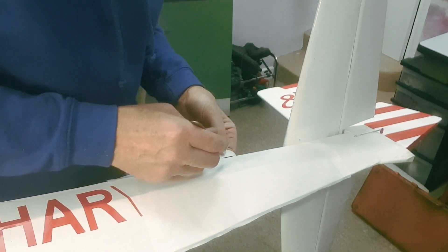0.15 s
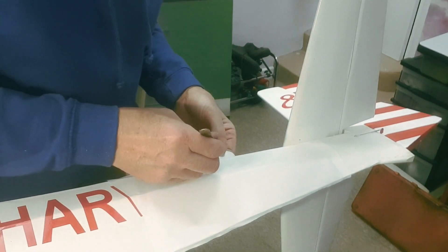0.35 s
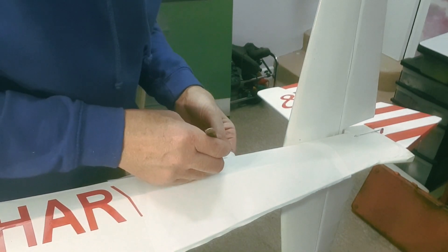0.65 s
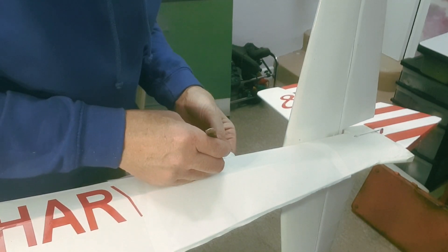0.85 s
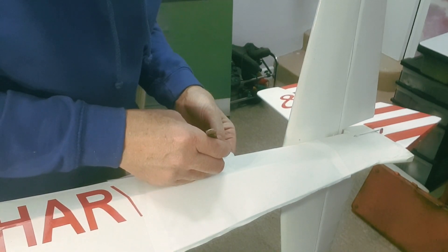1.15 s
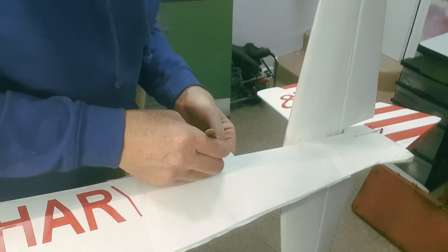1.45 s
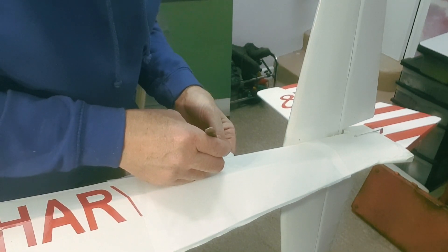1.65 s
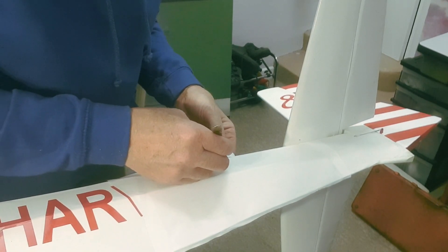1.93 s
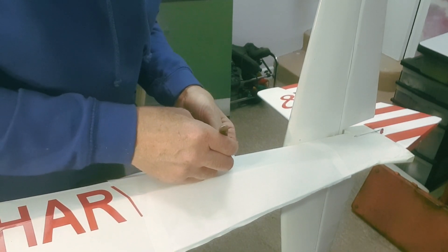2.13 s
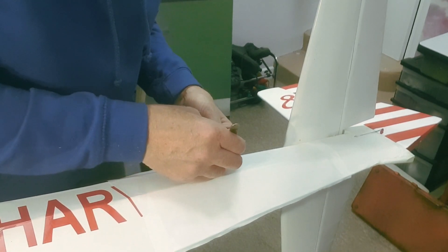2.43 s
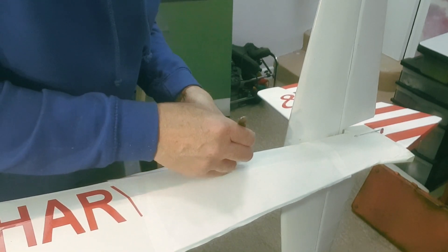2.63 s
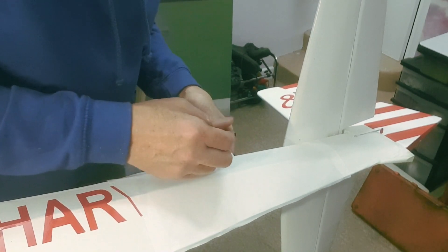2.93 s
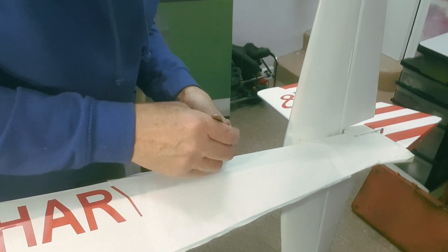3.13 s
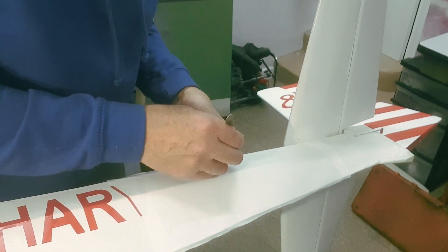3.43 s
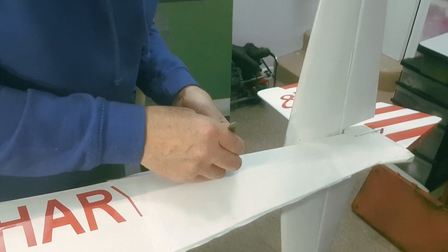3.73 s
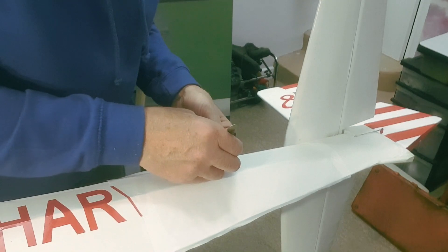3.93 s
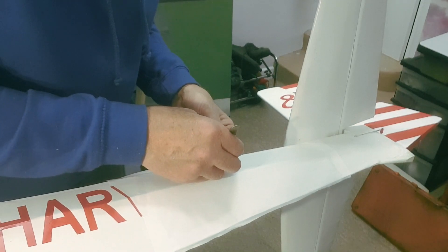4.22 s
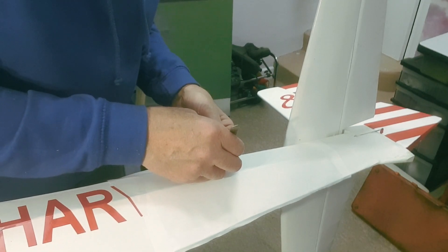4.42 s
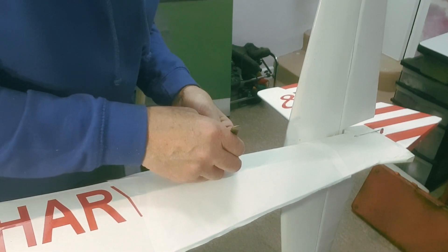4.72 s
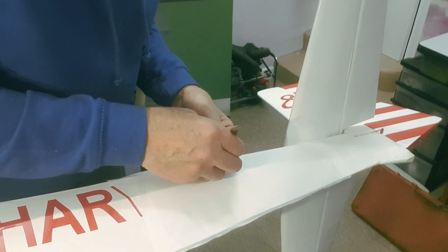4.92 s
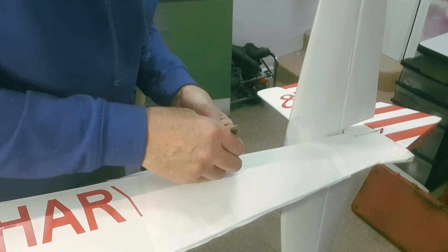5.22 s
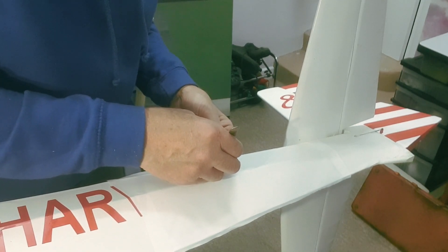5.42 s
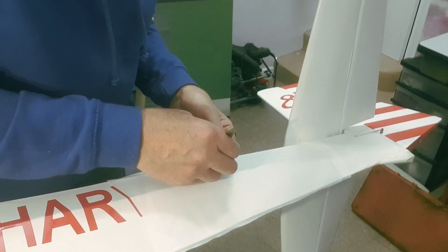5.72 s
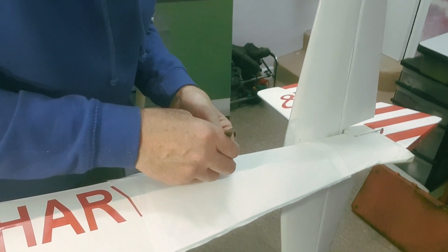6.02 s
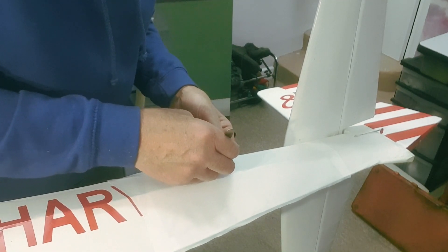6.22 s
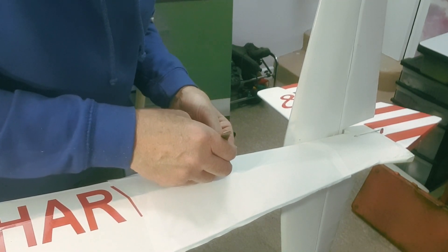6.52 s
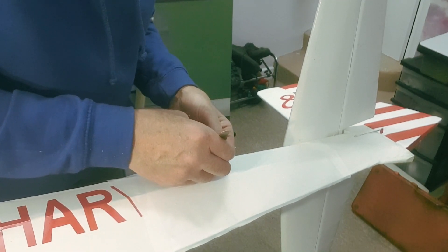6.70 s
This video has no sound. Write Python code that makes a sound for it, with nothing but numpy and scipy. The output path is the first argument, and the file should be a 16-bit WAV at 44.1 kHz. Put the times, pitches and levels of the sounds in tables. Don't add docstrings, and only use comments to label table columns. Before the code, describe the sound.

A constant low transformer hum with faint hiss and a barely audible high whine fills a small quiet workshop. Hands work on the taut covering of a light model aircraft: sparse at first, then bursts of soft hollow thumps, fingertip scratches and sleeve swishes. A bright tap clicks just after four seconds, a duller one follows, and further rubbing and small ticks continue to the end. Close stereo microphone, short room reflections.

```python
import sys
import numpy as np
from scipy import signal
from scipy.fft import rfft, irfft, next_fast_len
from scipy.io import wavfile
from scipy.ndimage import uniform_filter1d

SR = 44100
rng = np.random.default_rng(int(sys.argv[2]) if len(sys.argv) > 2 else 0)


def materialize(psi):
    bounded = np.clip(np.atleast_2d(psi).T, -1, 1)
    quanta = np.round(bounded * 32767).astype(np.int16)
    wavfile.write(sys.argv[1], SR, quanta)


def gain_from_db(level_db):
    decades = np.asarray(level_db, float) / 20
    return 10 ** decades


N = 302526
SIZE = next_fast_len(N + SR)
HZ = np.arange(SIZE // 2 + 1) * SR / SIZE
TIME = np.arange(N) / SR


def shape_db(table):
    hz, db = np.transpose(table)
    return np.interp(np.log(HZ + 1), np.log(hz), db)


def modes_db(modes):
    power = 1e-9
    for hz, width_hz, db in modes:
        detune = (HZ - hz) / (width_hz / 2)
        power = power + gain_from_db(db) ** 2 / (1 + detune ** 2) ** 2
    return 10 * np.log10(power)


def colour(x, gain_db):
    cepstrum = irfft(gain_db * np.log(10) / 20, SIZE)
    cepstrum[1:SIZE // 2] *= 2
    cepstrum[SIZE // 2 + 1:] = 0
    return irfft(rfft(x, SIZE) * np.exp(rfft(cepstrum)), SIZE)[..., :N]


def unit(x):
    return x / np.sqrt(np.mean(x ** 2))


def walk(rate_hz):
    hold = int(SR / rate_hz)
    steps = np.repeat(rng.standard_normal(N // hold + 1), hold)
    slewed = uniform_filter1d(uniform_filter1d(steps, hold), hold)
    return 0.71 * slewed[:N]


HUM_HZ = 100.125
HUM_SAG_DB = -0.45
# multiple, left_db, right_db, phase_rad, wobble_db
HUM_PARTIALS = [
    (1, -41.75, -42.4, .62, .03),
    (2, -60.5, -58, -3.03, .6),
    (3, -75.5, -82, -.75, 1.5),
    (4, -86, -86, .3, 2.2),
]


def hum():
    out = np.zeros((2, N))
    for multiple, left_db, right_db, phase_rad, wobble_db in HUM_PARTIALS:
        angle = 2 * np.pi * round(multiple) * HUM_HZ * TIME + phase_rad
        tone = np.sqrt(2) * np.cos(angle) * gain_from_db(wobble_db * walk(1.52))
        out += gain_from_db(np.array([[left_db], [right_db]])) * tone
    return out * gain_from_db(HUM_SAG_DB * (TIME / TIME[-1] - 0.5))


WHINE_HZ = 15069
# offset_in_hum_multiples, level_db
WHINE_LINES = [
    (-2, -90.5),
    (-1, -85),
    (0, -75.5),
    (1, -83.5),
]


def whine():
    drift = 2 * np.pi * np.cumsum(3.4 * walk(2.1)) / SR
    side_phase = np.array([[0.9], [-0.9]])
    out = np.zeros((2, N))
    for offset, db in WHINE_LINES:
        phase = 2 * np.pi * (WHINE_HZ + round(offset) * HUM_HZ) * TIME + drift
        fade = gain_from_db(db + 3.0 * walk(1.4))
        out += fade * np.sqrt(2) * np.cos(phase + side_phase)
    return out


# freq_hz, density_db_per_hz
RUMBLE_MID = [(20, -94.5), (32, -99.5), (41, -89.5), (49, -78), (70, -78.5), (120, -83), (170, -86.5),
              (250, -91), (330, -99), (420, -104), (600, -112), (1000, -122), (2000, -140)]
# freq_hz, relative_to_mid_db
RUMBLE_DIFFERENCE = [(30, -7.5), (100, -5.5), (300, -1), (600, -2)]
# freq_hz, density_db_per_hz
HISS_COLOUR = [(260, -33), (450, -8), (1000, -9.5), (1740, -10), (4440, -16), (6340, -16.5), (7300, -25),
               (8410, -26), (11700, -5.5), (14450, -5.5), (14700, -1.5), (15050, 1.5), (15300, -2.5),
               (15700, -2.5)]
# freq_hz, left_minus_right_db
HISS_BALANCE = [(60, -15.5), (110, 11), (200, -2), (380, 0), (700, 1), (1290, 0), (2380, 1), (4400, -1),
                (8120, 3), (15000, -1.5)]
HISS_DB = -61.0


def air():
    white = rng.standard_normal((4, N)) * np.sqrt(SR / 2)
    rumble_db, hiss_db = shape_db(RUMBLE_MID), shape_db(HISS_COLOUR)
    half_lean_db = shape_db(HISS_BALANCE) / 2
    mid = colour(white[0], rumble_db)
    side = colour(white[1], rumble_db + shape_db(RUMBLE_DIFFERENCE))
    hiss_left = colour(white[2], hiss_db + half_lean_db)
    hiss_right = colour(white[3], hiss_db - half_lean_db)
    hiss = unit(np.array([hiss_left, hiss_right])) * gain_from_db(HISS_DB)
    return np.array([mid + side, mid - side]) + hiss


def effort(rows, rest_db, rise_db_s, fall_db_s):
    power = gain_from_db(np.array(rest_db))[:, None] ** 2 + np.zeros(N)
    for start_s, held_s, *db in rows:
        early_s = np.maximum(start_s - TIME, 0)
        late_s = np.maximum(TIME - start_s - held_s, 0)
        shape = gain_from_db(-rise_db_s * early_s - fall_db_s * late_s)
        power = power + (gain_from_db(np.array(db))[:, None] * shape) ** 2
    return np.sqrt(power)


def slips(rate_hz, spread_db, channels):
    grain = gain_from_db(spread_db * walk(rate_hz))
    return grain * rng.standard_normal((channels, N))


def spread(pair, likeness, lean_db):
    c = np.clip(likeness, 0, 1)
    mid = pair[0] * np.sqrt((1 + c) / 2)
    side = pair[1] * np.sqrt((1 - c) / 2)
    return np.array([(mid + side) * gain_from_db(lean_db / 2), (mid - side) * gain_from_db(-lean_db / 2)])


# start_s, held_s, skin_db, rib_db
PUSH_EVENTS = [(.202, .005, -69, -84), (.774, .005, -67, -83), (1.404, .01, -69, -85),
               (1.602, 0.018, -62.5, -77), (1.77, .005, -61.5, -77), (1.846, .01, -63.5, -72),
               (1.94, .02, -69, -72), (2.0, .07, -60, -75), (2.115, 0.16, -64.5, -70.5),
               (2.31, 0.19, -61, -73), (2.465, 0.046, -54, -67), (2.575, .04, -64, -68),
               (2.689, .005, -57, -72), (3.046, .01, -65, -86), (3.553, 0.043, -52, -64.5),
               (3.775, 0.077, -61.5, -74.5), (4.17, 0.054, -67, -75), (4.31, 0.0046, -64, -90),
               (4.436, .03, -66, -90), (4.648, 0.025, -63.5, -84), (4.79, .03, -65, -78),
               (5.072, 0.0075, -64, -88), (5.205, 0.073, -54.5, -64.5), (5.412, .04, -57.5, -64),
               (5.535, 0.043, -56.5, -67), (5.86, .01, -71, -81), (6.424, 0.095, -61, -72.5),
               (6.72, 0.091, -60, -68), (6.84, .02, -54.5, -62)]
PUSH_RISE_DB_S, PUSH_FALL_DB_S = 643, 220
# start_s, held_s, scratch_db, swish_db
STROKE_EVENTS = [(.33, .03, -79, -80.5), (1.336, .04, -91, -82), (1.602, .01, -82, -87),
                 (1.846, 0.036, -76, -80), (1.95, 0.15, -80, -81.5), (2.148, .16, -74, -80),
                 (2.335, 0.12, -70, -72.5), (2.49, 0.12, -75.5, -69), (2.61, 0.028, -73, -66),
                 (3.05, .07, -89, -84), (3.338, 0.022, -79, -83), (3.566, 0.05, -77, -81),
                 (3.79, 0.018, -79, -79.5), (4.23, .06, -83, -71.5), (4.34, 0.017, -77, -73.5),
                 (4.61, 0.033, -77.5, -80), (4.93, .04, -82, -79.5), (5.072, .02, -76, -83),
                 (5.232, 0.046, -70, -71), (5.35, 0.092, -75, -76), (5.54, 0.026, -72, -74),
                 (5.68, .03, -94, -81), (5.86, .01, -89, -85), (6.262, .01, -82, -87),
                 (6.324, 0.022, -79, -79.5), (6.424, 0.093, -73.5, -76), (6.698, .03, -75, -82),
                 (6.73, .02, -75, -82), (6.795, .07, -86, -70)]
STROKE_RISE_DB_S, STROKE_FALL_DB_S = 344, 178
# skin_db, rib_db, scratch_db, swish_db
HOLD_DB = (-81, -109.5, -91.5, -91)
# freq_hz, width_hz, gain_db
SKIN_MODES = [
    (182, 100, -13.5),
    (236, 140, 0.5),
    (310, 40.5, 7),
    (370, 30, 0),
]
# freq_hz, width_hz, gain_db
RIB_MODES = [
    (451, 29, -1),
    (490, 62, -4),
    (611, 45, -3.5),
    (699, 70, -13),
    (1020, 370, -17.5),
]
# freq_hz, density_db_per_hz
SCRATCH_COLOUR = [(500, -24.5), (750, -1), (1100, -1), (1500, -8), (2200, -7), (2750, -2), (3200, -9),
                  (4200, -8), (5500, -35)]
# freq_hz, density_db_per_hz
SWISH_COLOUR = [(2500, -30), (3700, -15), (4550, -10.5), (4850, -3), (5250, -4.5), (5750, -6), (6700, -5),
                (7300, -18.5), (8300, -23.5), (12000, -23.5)]


def hands():
    push, rib = effort(PUSH_EVENTS, HOLD_DB[:2], PUSH_RISE_DB_S, PUSH_FALL_DB_S)
    finger, cloth = effort(STROKE_EVENTS, HOLD_DB[2:], STROKE_RISE_DB_S, STROKE_FALL_DB_S)
    skin = unit(colour(slips(60, 2.7, channels=2), modes_db(SKIN_MODES))) * push * gain_from_db(-1.5)
    ribs = unit(colour(slips(60, 3.4, channels=2), modes_db(RIB_MODES))) * rib * gain_from_db(-3.0)
    scratch = unit(colour(slips(300, 3.5, channels=2), shape_db(SCRATCH_COLOUR))) * finger * gain_from_db(1.0)
    swish = unit(colour(slips(300, 2.7, channels=2), shape_db(SWISH_COLOUR))) * cloth * gain_from_db(4.0)
    drumming = spread(skin, 0.81, -0.92) + spread(ribs, 0.72, 0.4)
    rubbing = spread(scratch, 0.089, 0.82) + spread(swish, 0.04, 2.1)
    return drumming + rubbing


ROOM_T60_S, ROOM_BUILD_S = 0.23, 0.0091


def room():
    t = TIME[:SR // 2]
    envelope = (1 - np.exp(-t / ROOM_BUILD_S)) * gain_from_db(-60 * t / ROOM_T60_S)
    tail = rng.standard_normal((2, len(t))) * envelope
    return tail / np.sqrt(np.sum(tail ** 2, axis=1, keepdims=True))


# start_s, peak_db, bounce_db, room_db
BRIGHT_BLOWS = [(1.3299, -60, 3, 3.5), (2.0503, -56, 2, -8), (2.1164, -58, 2, 2), (4.21, -29.5, -12, -3),
                (4.334, -54, 0, -6), (4.6149, -65, 11, -1.5), (5.2006, -62, 5, -11), (5.2313, -52.5, 1, 3),
                (5.249, -58, 15, -8), (5.3854, -54, -2, 2.5), (5.5235, -52.5, -2, 2.5),
                (5.629, -53.5, 1, -1.5), (6.4238, -59, 1, 10), (6.6922, -66, -1.5, -3),
                (6.7705, -40.5, 0, 0), (6.7856, -49, 3, -14), (6.834, -49, -4, -10), (6.855, -45.5, 4, -6)]
# start_s, peak_db, bounce_db, room_db
DULL_BLOWS = [
    (4.8015, -54, -17, -10),
    (4.8101, -36, 0, 0),
]
# start_s, peak_db, room_db
THUD_BLOWS = [
    (2.669, -53, -10),
]
# freq_hz, gain_db
BRIGHT_COLOUR = [(600, -41), (1200, -20), (1500, -6), (2000, -9), (2500, -2.5), (3600, -0.5), (4500, -0.5),
                 (5600, -3.5), (7200, -10), (8500, -14.5), (11500, -10), (15000, -15.5)]
# freq_hz, gain_db
DULL_COLOUR = [(600, -37), (950, -12.5), (1450, -1.5), (1840, 2), (2050, -5), (2350, 2.5), (2900, -0.5),
               (3900, -11), (4800, -5), (5300, -11), (6100, -11.5), (7200, -27), (9000, -33), (15000, -44)]
BOUNCE_S = 0.00178
THUD_HZ, THUD_T60_S = 780, 0.0088


def tap_voice(table):
    click = np.zeros(N)
    click[0] = 1
    voice = colour(click, shape_db(table))[:SR // 20]
    return -voice / np.abs(voice).max()


def taps():
    dull, bright = tap_voice(DULL_COLOUR), tap_voice(BRIGHT_COLOUR)
    t = TIME[:len(dull)]
    thud = np.sin(2 * np.pi * THUD_HZ * t) * gain_from_db(-60 * t / THUD_T60_S)
    blows = [(s, gain_from_db(db) * thud, -9, room_db) for s, db, room_db in THUD_BLOWS]
    for voice, rows in ((bright, BRIGHT_BLOWS), (dull, DULL_BLOWS)):
        blows += [(s, gain_from_db(db) * voice, bounce_db, room_db) for s, db, bounce_db, room_db in rows]
    lag = int(BOUNCE_S * SR)
    direct_lean = gain_from_db(np.array([[1.9], [-1.9]]))
    room_lean_db = np.array([[0.9], [-0.9]])
    out = np.zeros((2, N + SR))
    for start_s, voice, bounce_db, room_db in blows:
        i = int(start_s * SR)
        tail = signal.fftconvolve(voice[None], room(), axes=1)
        out[:, i:i + len(voice)] += voice * direct_lean
        out[:, i + lag:i + lag + len(voice)] += gain_from_db(bounce_db) * voice
        out[:, i:i + tail.shape[1]] += tail * gain_from_db(room_db + 8.5 + room_lean_db)
    return out[:, :N]


# start_s, peak_db, pitch_hz, swell_ms
KNOCK_EVENTS = [(1.985, -53, 220, 8.3), (2.11, -60, 486, 8), (2.474, -40.5, 215, 5.4),
                (2.471, -50, 332, 6.2), (2.522, -43, 363, 7.4), (2.571, -58, 320, 7),
                (3.548, -53, 288.4, 11), (3.574, -42.5, 307, 9.3), (3.575, -61, 610, 12),
                (3.635, -57, 294, 8), (3.789, -55, 280, 8.8), (3.875, -61.5, 370, 7.5),
                (5.205, -68, 282, 8), (5.232, -53, 586, 6.7), (5.238, -44, 347, 2.7),
                (5.273, -49.5, 345, 5.9), (5.411, -48, 224, 10), (5.436, -51, 370, 5.5),
                (5.54, -54, 306, 9.7), (5.57, -57, 322, 9), (6.441, -47.5, 227, 4.5), (6.742, -53, 225, 11),
                (6.80, -51, 308, 14), (6.835, -47, 215, 7.8), (6.84, -59, 310, 14)]


def knocks():
    t = TIME[:SR // 5]
    out = np.zeros(N + SR)
    for start_s, db, pitch_hz, swell_ms in KNOCK_EVENTS:
        i = int(start_s * SR)
        rise = t / (max(swell_ms, 2) / 1000)
        envelope = rise * np.exp(1 - rise)
        out[i:i + len(t)] += gain_from_db(db - 3.5) * envelope * np.sin(2 * np.pi * pitch_hz * t)
    return out[:N] * gain_from_db(np.array([[-0.6], [0.6]]))


def scene():
    return hum() + whine() + air() + hands() + taps() + knocks()


def roll_off(x):
    return signal.sosfilt(signal.butter(12, 16180, fs=SR, output="sos"), x)


TOP_HZ = 15728


def record(dry):
    cut = irfft(rfft(dry, SIZE) * (HZ < TOP_HZ), SIZE)[:, :N]
    return roll_off(cut)


dry = scene()
out = record(dry)
materialize(out)
```